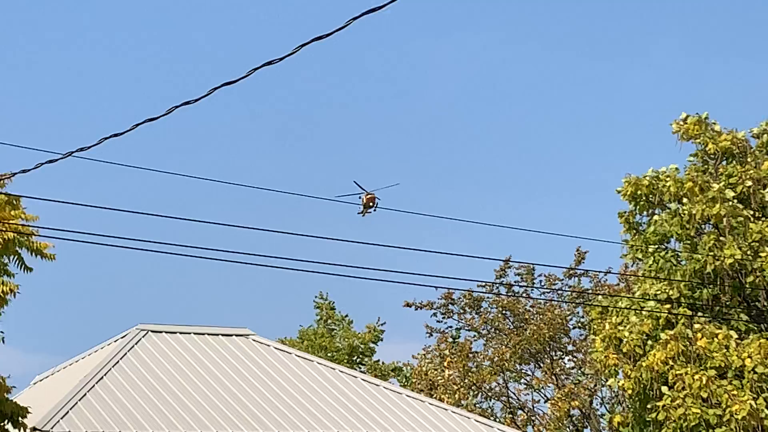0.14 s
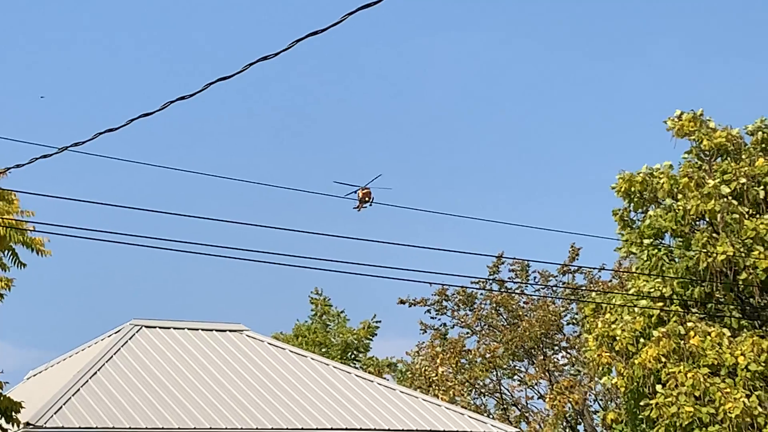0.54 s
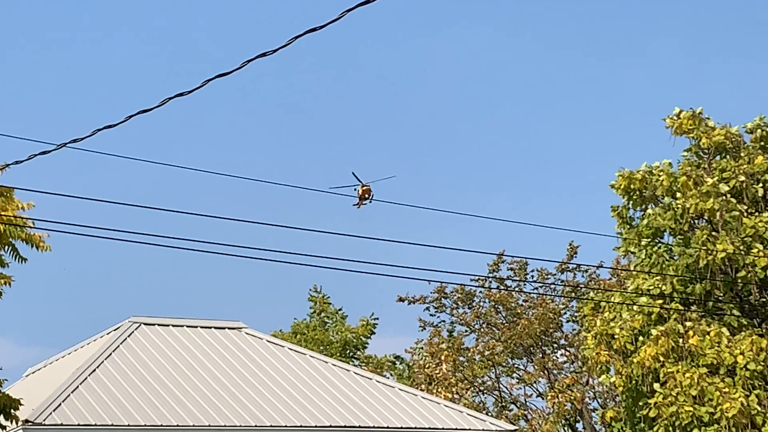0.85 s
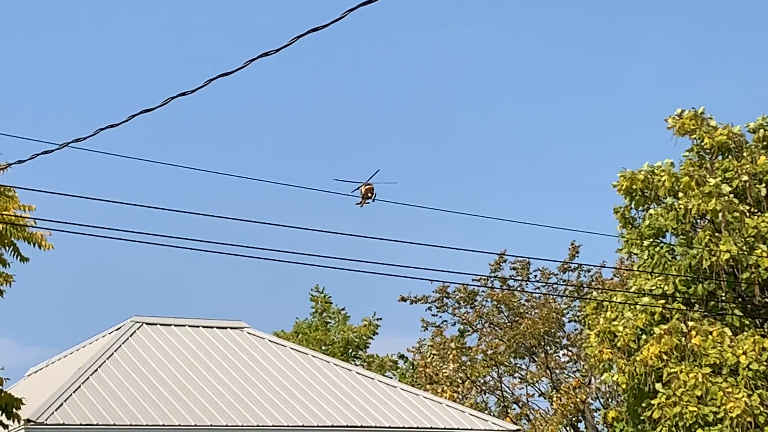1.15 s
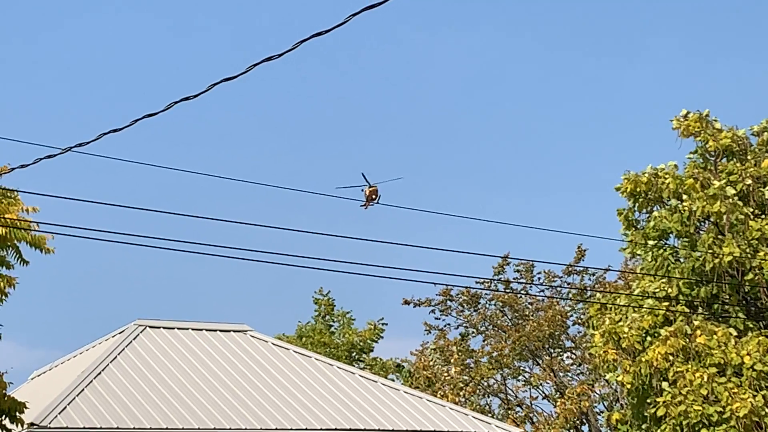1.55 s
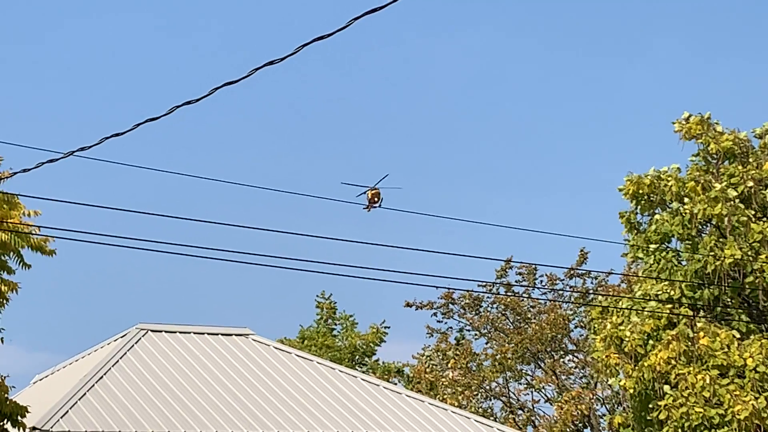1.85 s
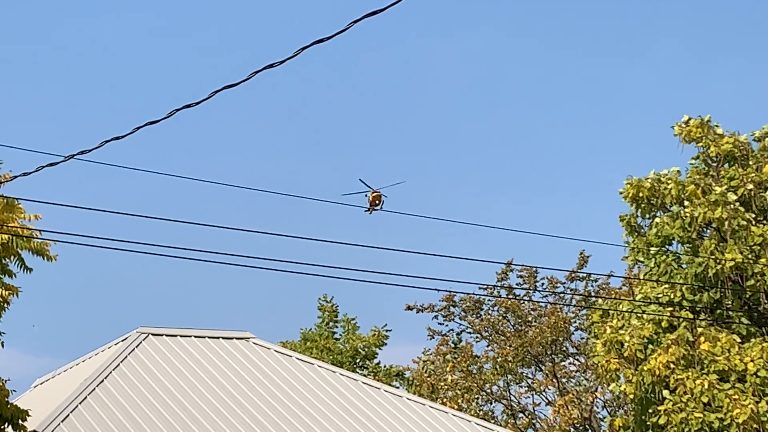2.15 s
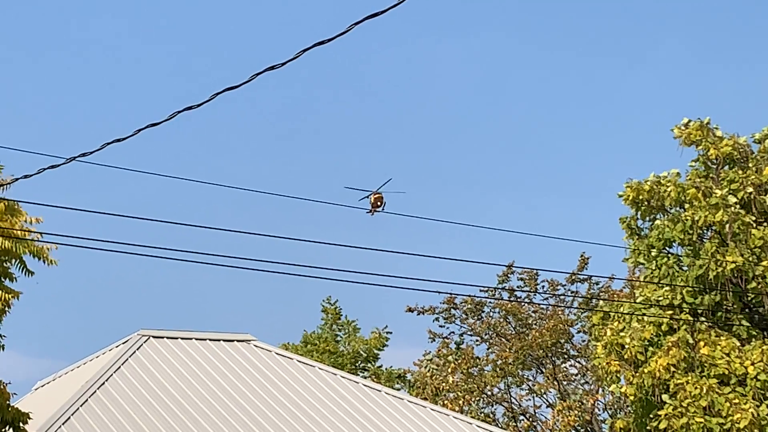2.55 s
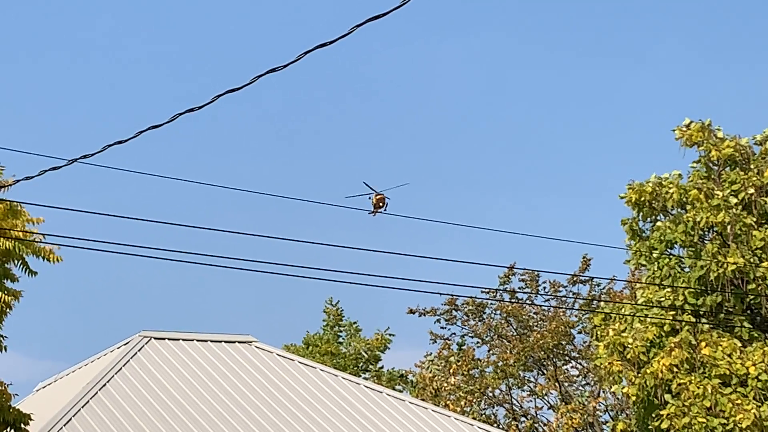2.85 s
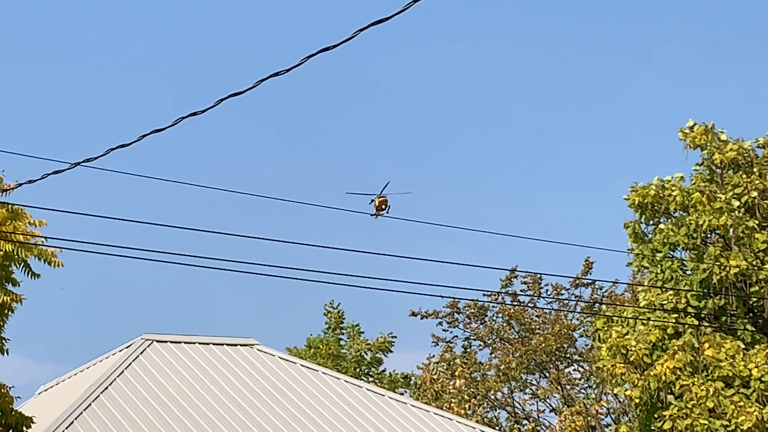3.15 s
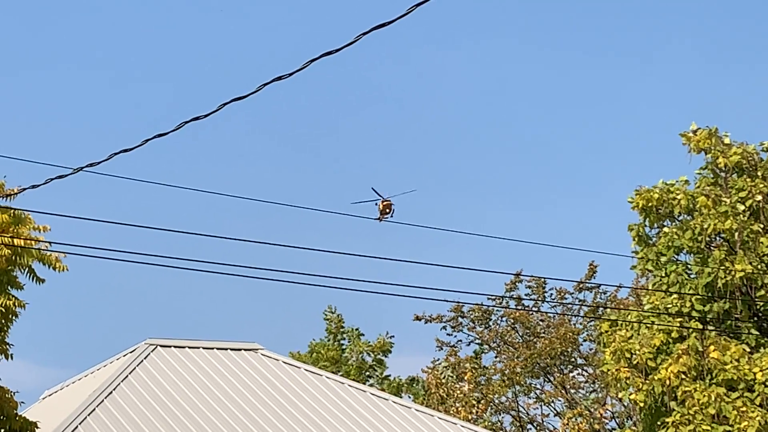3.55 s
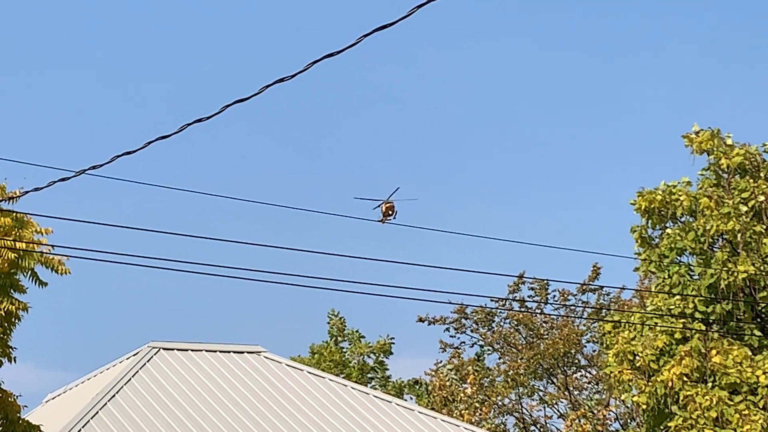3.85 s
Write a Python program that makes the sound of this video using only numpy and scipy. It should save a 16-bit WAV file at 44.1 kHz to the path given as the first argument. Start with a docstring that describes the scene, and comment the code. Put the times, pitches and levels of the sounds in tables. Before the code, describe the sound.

A helicopter hovers some distance away outdoors, its blades chopping about twenty times a second over a low hum and roar. Midway, small scuffs and rustles sound close to the handheld microphone, with one thin bird peep.

```python
"""Hovering helicopter heard from a garden

A helicopter hovers a few hundred metres off. Its main rotor is a train of shaped noise bursts, a slap and a
swish per blade; its tail rotor is a sum of harmonics; downwash and turbine exhaust are filtered noise.
A delayed ground reflection combs rotor and roar, and the drifting delay makes them waver. Enveloped noise
gives scuffs, rustle and ticks close to the phone and a light breeze; a small bird adds one thin sine note."""
import sys
import numpy as np
from scipy import signal
from scipy.fft import rfft, irfft
from scipy.io import wavfile
from scipy.ndimage import map_coordinates

SR = 44100
rng = np.random.default_rng(int(sys.argv[2]) if len(sys.argv) > 2 else 0)


def transcribe(signal):
    """Save signal, clipped to [-1, 1], as a 16-bit WAV file at the path in sys.argv[1]."""
    frames = np.atleast_2d(signal).T
    limited = np.clip(frames, -1, 1)
    pcm = np.round(limited * 32767).astype(np.int16)
    wavfile.write(sys.argv[1], SR, pcm)


N = 176400
SIDES = np.array([[1], [-1]])  # sign of the side signal in left and right

# Strength of the blade slap. Each row: time in seconds, level in dB relative to SLAP_DB.
SLAP_STRENGTH = [(0, -2.5), (.3, -8.5), (.55, -4), (.74, -2), (1.0, -1.5), (1.11, -3.5), (1.3, -6),
                 (1.62, -2), (1.82, -8), (2.05, -7), (2.3, -8), (2.52, -6), (2.65, -10), (2.95, -1),
                 (3.16, -0.5), (3.46, 4), (3.53, 1.5), (3.67, 3), (3.86, 5), (4, -1)]
# Blades that cut a tip vortex, nearly all slapping harder. Each row: time in seconds, extra level in dB.
VORTEX_SLAPS = [(.09, 7), (.415, 1), (.505, 1.5), (.645, 6), (.69, 1.5), (.83, 3.5), (1.02, 2.5),
                (1.06, 1.5), (1.2, 6), (1.39, 6.5), (1.435, 3.5), (1.95, 5), (2.13, 4), (2.925, 1),
                (3.25, 6.5), (3.39, -0.5), (3.44, 3.5), (3.625, 3), (3.81, 1.5)]
# Spectrum of the slap. Each row: frequency in Hz, level in dB.
SLAP_SPECTRUM = [(100, -27), (300, -8.5), (550, 2), (900, 3), (1120, 0.5), (1450, -1.5), (1900, -2.5),
                 (2600, -10.5), (3900, -13.5), (5200, -26.5), (8000, -45), (16000, -69.5)]
# Centre of the spectral bump that gives the slap its bark. Each row: time in seconds, frequency in Hz.
BARK_CENTRE = [(0, 1250), (.65, 1340), (.9, 1670), (1.4, 1380), (2.9, 1485), (3.45, 1545), (3.65, 1630),
               (3.85, 1320)]
# Shelf on the slap's treble. Each row: time in seconds, gain in dB.
SLAP_TREBLE = [(0, 0), (.7, 3.5), (1.0, 1), (1.3, -2.5), (1.7, 3), (2.9, -2.5), (3.07, 3.5), (3.2, -2.5),
               (3.42, -6), (3.62, 1), (4, -3)]
# Phase lead of the left channel over the right. Each row: frequency in Hz, phase in radians.
LEFT_LEAD = [(500, 0.5), (850, 0.1), (1350, -1.02), (1600, 0.43), (2050, -2.5), (2650, -3), (3000, -4.5),
             (3600, -9), (4200, -4.5), (4900, -8.5)]
BLADE_HZ, FIRST_BLADE_S, SLAP_JITTER_S = 21.492, .0418, .0005
SLAP_DB, SLAP_SCATTER_DB, SLAP_WIDTH_DB = -21.5, .7, -3.5  # the last caps side against mid
LEAD_S, ATTACK_S, CRACK_S, SWISH_S = .014, .002, .009, .024  # swell before the crack; time constants
SWISH_DB, SWISH_SHARE = -7, .34  # the share is dB of extra swish per dB of slap strength
BARK_WIDTH_HZ, BARK_DB, HARD_BARK_SHARE = 194, 7.5, .8  # dB of extra bark per dB of a hard slap
SIZZLE_HZ = 2900
SLAP_MEMORY, PATCH_MEMORY = .5, .45  # correlation from one blade to the next
PATCH_HZ, PATCH_DB = 170, 2.6  # spacing and depth of random patches in the spectrum


def main_rotor():
    """Blade-vortex slap: correlated noise bursts at blade rate, each swelling to a crack and trailing a swish.

    Each blade meets much the same wake as the one before, so burst and patchy colour change only gradually."""
    size = 8192
    age = np.arange(size) / SR - LEAD_S  # seconds since the crack
    hz = np.arange(size // 2 + 1) * SR / size
    rise = np.exp(np.minimum(age, 0) / ATTACK_S)
    after = np.maximum(age, 0)
    fade = np.clip(np.minimum((age + LEAD_S) / ATTACK_S, 2 - age * BLADE_HZ), 0, 1)

    starts = np.arange(FIRST_BLADE_S, N / SR, 1 / BLADE_HZ)
    blade_db = np.interp(starts, *np.array(SLAP_STRENGTH).T)
    blade_db = blade_db + SLAP_SCATTER_DB * rng.standard_normal(len(starts))
    hard_db = np.zeros(len(starts))
    for s, extra_db in VORTEX_SLAPS:
        hard_db[np.argmin(abs(starts - s))] = extra_db  # the nearest blade

    width = np.minimum(response(WIDTH, size), undb(SLAP_WIDTH_DB))
    colour = response(SLAP_SPECTRUM, size)
    turn = np.exp(.5j * SIDES * np.interp(hz, *np.array(LEFT_LEAD).T))
    shelf = 1 / (1 + (SIZZLE_HZ / (hz + 1)) ** 4)
    wake, patches = rng.standard_normal((2, size)), rng.standard_normal(size)
    out = np.zeros((2, N + size))
    for s, db, extra_db in zip(starts, blade_db, hard_db):
        wake, patches = evolve(wake, SLAP_MEMORY), evolve(patches, PATCH_MEMORY)
        swish = undb(SWISH_DB + SWISH_SHARE * db) * np.exp(-after / SWISH_S)
        shape = rise * (np.exp(-after / CRACK_S) + swish)
        shape = shape / shape.max()

        bark_hz = np.interp(s, *np.array(BARK_CENTRE).T)
        bark_db = BARK_DB + HARD_BARK_SHARE * extra_db
        bark = bark_db * np.exp(-((hz - bark_hz) / BARK_WIDTH_HZ) ** 2)
        sizzle = shelf * np.interp(s, *np.array(SLAP_TREBLE).T)
        patchy = PATCH_DB * map_coordinates(patches, [hz / PATCH_HZ])

        mid, side = rfft(wake * shape)
        stereo = (mid + SIDES * width * side) / np.sqrt(1 + width ** 2)
        burst = irfft(stereo * turn * colour * undb(bark + sizzle + patchy))
        burst = burst * np.sqrt(np.mean(shape ** 2) / np.mean(burst ** 2))  # as strong as its envelope
        i = int((s - LEAD_S + SLAP_JITTER_S * rng.standard_normal()) * SR)
        out[:, i:i + size] += undb(SLAP_DB + db + extra_db) * burst * fade
    return out[:, :N]


# Tail rotor harmonics, shifting as the machine turns a little. Each row: multiple of TAIL_HZ,
# first level in dB, last level in dB, both relative to TAIL_DB.
TAIL_HARMONICS = [(2, 0.2, -1), (3, -12, -8.5), (4, -11, -5.5), (5, -17, -14.5), (6, -8, -12),
                  (7, -26, -31), (8, -26, -27), (10, -32, -23)]
TAIL_HZ, TAIL_DRIFT = 55.15, .0035  # the drift is a share of the frequency
TAIL_DB, TAIL_WAVER_DB = -25, 1.43  # the waver is that of the second harmonic


def tail_rotor():
    """Rotational tone: a harmonic series on one drifting phase, its higher partials wavering more."""
    phase = 2 * np.pi * np.cumsum(TAIL_HZ * (1 + TAIL_DRIFT * walk(7))) / SR
    hum = 0
    for k, first_db, last_db in TAIL_HARMONICS:
        waver = TAIL_WAVER_DB * np.sqrt(k / 2) * walk(11)
        db = np.linspace(first_db, last_db, N) + waver
        hum = hum + undb(db) * np.sin(round(k) * phase + rng.uniform(0, 2 * np.pi))
    return np.sqrt(2) * undb(TAIL_DB) * hum  # sqrt(2) makes the levels rms


# Levels of the rotor's roar, the downwash rumble and the low exhaust drone.
# Each row: time in seconds, level in dB.
ROAR_LEVEL = [(0, -30.5), (.75, -30.5), (1.3, -30.5), (1.8, -32.5), (2.26, -32), (2.37, -27.5), (2.8, -28),
              (3.1, -27.5), (3.5, -27), (4, -29)]
RUMBLE_LEVEL = [(0, -29.5), (.4, -27.5), (.8, -25), (1.4, -23.5), (1.9, -28.5), (2.4, -26.5), (3, -26.5),
                (3.6, -24.5), (4, -27)]
DRONE_LEVEL = [(0, -30.5), (.6, -37), (1.3, -38), (1.9, -36), (2.5, -31.5), (3.3, -33.5), (4, -33)]
# Their spectra. Each row: frequency in Hz, level in dB.
ROAR_SPECTRUM = [(30, -34), (150, -20), (300, -10), (420, 0), (600, -1), (900, -5), (1500, -9),
                 (2200, -17.5), (3500, -23), (5000, -32.5), (7500, -49), (11000, -49.5), (16000, -65)]
RUMBLE_SPECTRUM = [(10, -50), (25, -28), (42, -12), (62, 1.5), (90, 1), (135, 2.5), (190, -2), (300, -18),
                   (2000, -70)]
DRONE_SPECTRUM = [(30, -42), (90, -3.5), (175, 1), (240, 3), (315, 4), (410, -5.5), (700, -34.5),
                  (3000, -69.5)]
FLUTTER_DB, FLUTTER_PER_S = 1.1, 22


def downwash():
    """Turbulence noise: churned air and turbine exhaust as rumble and drone under a fluttering roar."""
    flutter = undb(FLUTTER_DB * walk(FLUTTER_PER_S))
    roar = curve(ROAR_LEVEL) * flutter * noise(ROAR_SPECTRUM)
    rumble = curve(RUMBLE_LEVEL) * noise(RUMBLE_SPECTRUM)
    drone = curve(DRONE_LEVEL) * noise(DRONE_SPECTRUM)
    return rumble + drone + roar


GROUND_LAG_S, GROUND_DB, GROUND_TOP_HZ = .003417, -6, 2630
AIR_DRIFT = .068  # drift of the lag, as a share of it


def ground(x):
    """Comb filtering: a duller reflection from the ground interferes at a slowly drifting lag."""
    soft = signal.sosfilt(signal.butter(1, GROUND_TOP_HZ, fs=SR, output="sos"), x)
    lag = GROUND_LAG_S * (1 + AIR_DRIFT * walk(1.83))
    place = (clock() - lag) * SR
    echo = np.array([map_coordinates(c, [place], order=1, mode="mirror") for c in soft])
    return x + undb(GROUND_DB) * echo


# Near scuffs, then light, bright brushes. Each row: start in seconds, length in seconds, level in dB.
SCUFF_STROKES = [(2.352, 0.012, -34), (2.382, 0.033, -38), (2.442, 0.013, -31.5), (2.472, .008, -35.5),
                 (2.499, 0.014, -31), (2.54, 0.12, -47.5), (2.635, 0.022, -44), (2.675, 0.041, -42.5),
                 (2.76, 0.021, -35), (2.776, 0.014, -42.5), (3.445, 0.023, -42.5), (3.714, 0.027, -47)]
BRUSH_STROKES = [(.32, 0.15, -58), (1.94, 0.13, -47.5), (2.64, 0.066, -51), (3.58, 0.16, -52.5)]
# Soft rustle around the scuffs. Each row: time in seconds, level in dB.
RUSTLE_LEVEL = [(0, -55), (1.2, -47.5), (1.5, -53.5), (1.92, -49.5), (1.97, -50), (2.13, -43.5), (2.3, -41),
                (2.38, -35.5), (2.56, -48), (2.8, -39.5), (2.9, -42), (3.33, -46), (3.46, -37.5),
                (3.6, -46), (3.75, -44), (3.88, -49), (4, -76)]
# Faint handling ticks. Each row: peak time in seconds, level in dB.
HANDLING_TICKS = [(0.021, -51), (.095, -53.5), (.35, -50), (.69, -50), (1.01, -54), (1.55, -54),
                  (1.89, -53.5), (3.16, -56), (3.395, -54)]
# Spectra of the four. Each row: frequency in Hz, level in dB.
SCUFF_SPECTRUM = [(100, -14), (250, -3), (750, 7), (1200, -4), (2500, 5), (4000, 4), (5300, 6),
                  (7500, -4.5), (9500, -3.5), (12000, -17), (16000, -25)]
BRUSH_SPECTRUM = [(2000, 0), (6000, -1.5), (8500, -8), (11300, -2), (12500, -14), (15000, -14),
                  (16000, -11)]
RUSTLE_SPECTRUM = [(300, 28), (1000, 18.5), (3000, 27.5), (6500, 13.5), (9000, -9.5), (11500, -32),
                   (16000, -59)]
TICK_SPECTRUM = [(2000, -18.5), (6000, 5), (10000, 1), (16000, -4)]
SCUFF_PAN_DB, GRAIN_DB = -4, 1.5  # the pan is left minus right
TICK_RISE_S, TICK_FALL_S = .005, .023


def rustle():
    """Friction noise: grainy scuffs, soft rubbing, light brushes and a few ticks close to the phone."""
    t = clock()
    ticks = sum(undb(db) * np.exp(-abs(t - s) / np.where(t > s, TICK_FALL_S, TICK_RISE_S))
                for s, db in HANDLING_TICKS)
    rub = strokes(SCUFF_STROKES) * crackle(SCUFF_SPECTRUM) + curve(RUSTLE_LEVEL) * noise(RUSTLE_SPECTRUM)
    rub = rub * undb(GRAIN_DB * walk(300))
    rub = rub * undb(SIDES * SCUFF_PAN_DB / 2)
    brushes = strokes(BRUSH_STROKES) * noise(BRUSH_SPECTRUM)
    return rub + brushes + ticks * noise(TICK_SPECTRUM)


SCUFF_RISE_S, SCUFF_FALL_S = .008, .022


def strokes(rows):
    """Attack and decay envelope: linear rise, hold and exponential fall of each rubbing stroke."""
    t = clock()
    total = 0
    for s, length, db in rows:
        rise = np.clip((t - s) / SCUFF_RISE_S, 0, 1)
        fall = np.exp(-np.maximum(t - s - length, 0) / SCUFF_FALL_S)
        total = total + undb(db) * rise * fall
    return total


CRACKLE_PER_S, CRACKLE_SHARE = 900, .5  # the share is of power


def crackle(colour):
    """Shot noise: hiss mixed with sparse random clicks filtered by the same spectrum."""
    clicks = (rng.random(N) < CRACKLE_PER_S / SR) * rng.standard_normal((2, N))
    x = irfft(rfft(clicks) * response(colour), N)
    return np.sqrt(CRACKLE_SHARE) * x / x.std() + np.sqrt(1 - CRACKLE_SHARE) * noise(colour)


BIRD_S, BIRD_HALF_S, BIRD_HZ, BIRD_DB = 2.34, .04, 7640, -47.5  # centre, half length, pitch, peak


def bird():
    """Pure tone: one thin, high sine with a slight frequency waver under a flat-topped envelope."""
    phase = 2 * np.pi * np.cumsum(BIRD_HZ * (1 + .0046 * walk(120))) / SR
    envelope = np.exp(-((clock() - BIRD_S) / BIRD_HALF_S) ** 4)
    return undb(BIRD_DB) * envelope * np.sin(phase)


# Light breeze on the microphones. Each row: time in seconds, level in dB.
BREEZE_LEVEL = [(0, -34), (1, -39.5), (2, -41), (2.7, -42), (3.1, -50), (4, -50)]
# Its spectrum. Each row: frequency in Hz, level in dB.
BREEZE_SPECTRUM = [(10, -30.5), (24, -15.5), (42, 9.5), (60, -4.5), (100, -23.5), (1000, -75)]


def breeze():
    """Wind noise: low-frequency filtered noise for the air moving over the microphones."""
    return curve(BREEZE_LEVEL) * noise(BREEZE_SPECTRUM)


# Difference between the two microphones. Each row: frequency in Hz, side minus mid in dB.
WIDTH = [(30, -53), (80, -8.5), (250, -11), (500, -9), (1000, -3), (1600, 2.5), (2300, -0.5), (16000, 1.5)]


def noise(colour):
    """Partial coherence: filtered stereo noise of rms 1, alike in the bass and wide in the treble."""
    mid, side = rfft(rng.standard_normal((2, N)))
    width = response(WIDTH)
    stereo = (mid + SIDES * width * side) / np.sqrt(1 + width ** 2)
    x = irfft(stereo * response(colour), N)
    return x / x.std()


def evolve(x, memory):
    """Autoregression: keep a share of a random pattern and renew the rest at constant variance."""
    return memory * x + np.sqrt(1 - memory ** 2) * rng.standard_normal(x.shape)


def walk(rate):
    """Band-limited chance: spline through about rate random values a second; spread near 1."""
    grid = clock() * rate
    return map_coordinates(rng.standard_normal(4096), [grid + 2], order=3, mode="wrap")


def response(rows, size=N):
    """Transfer function: gain over frequency from (Hz, dB) points, joined on a log-frequency axis."""
    hz, db = np.array(rows).T
    bins = np.arange(size // 2 + 1) * SR / size
    return undb(np.interp(np.log(bins + 1e-9), np.log(hz), db))


def curve(rows):
    """Envelope: gain over time from (s, dB) points."""
    return undb(np.interp(clock(), *np.array(rows).T))


def clock():
    """Sampling: time of every sample in seconds."""
    return np.arange(N) / SR


def undb(db):
    """Logarithmic level: decibels to amplitude gain."""
    return 10 ** (np.asarray(db) / 20)


def scene():
    """Superposition: the helicopter over the ground, with the breeze and the small near sounds."""
    return tail_rotor() + ground(main_rotor() + downwash()) + breeze() + rustle() + bird()


# Treble balance of the microphones. Each row: frequency in Hz, left minus right in dB.
BALANCE = [(4300, 0), (5800, -2), (7300, 0.5)]
PORT_LAG_S, SHARED_HZ, TOP_HZ = .000222, 6500, 15800


def record(dry):
    """Crossover: above it the phone feeds one treble to both channels, late and inverted on the left."""
    hz = np.arange(N // 2 + 1) * SR / N
    left, right = rfft(dry)
    shared = 1 / (1 + (SHARED_HZ / (hz + 1)) ** 12)  # share of power
    late = right * np.exp(-2j * np.pi * hz * PORT_LAG_S)
    left = np.sqrt(1 - shared) * left - np.sqrt(shared) * late
    lean = np.sqrt(response(BALANCE))  # half the balance on each side
    stereo = irfft(np.array([left * lean, right / lean]), N)
    top_cut = signal.ellip(10, .2, 80, TOP_HZ, fs=SR, output="sos")
    return signal.sosfilt(top_cut, stereo)


dry = scene()
out = record(dry)
transcribe(out)
```